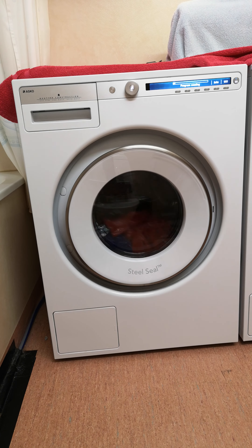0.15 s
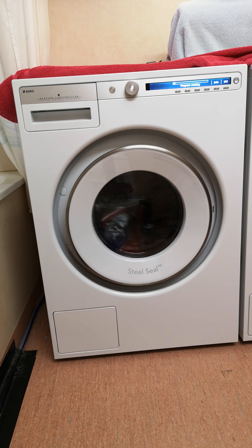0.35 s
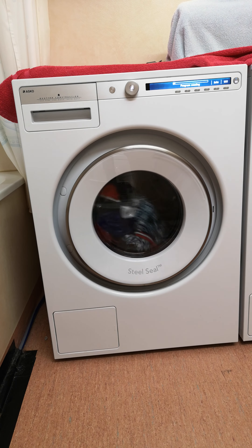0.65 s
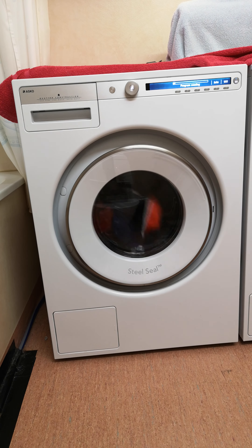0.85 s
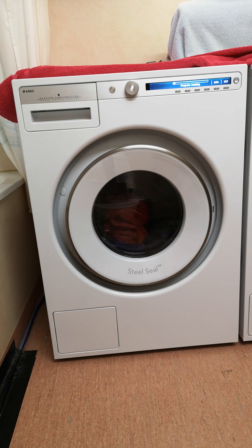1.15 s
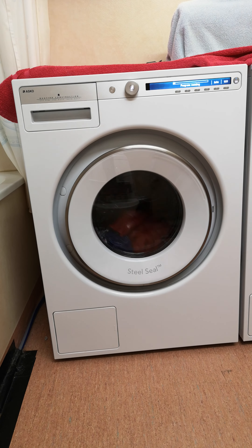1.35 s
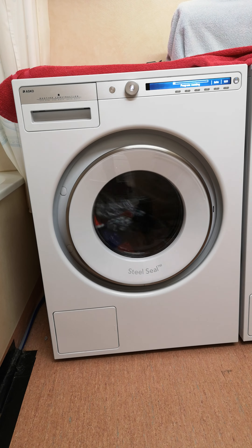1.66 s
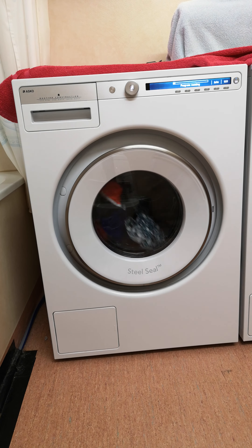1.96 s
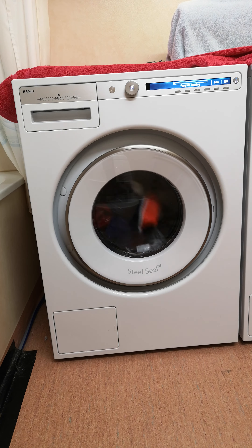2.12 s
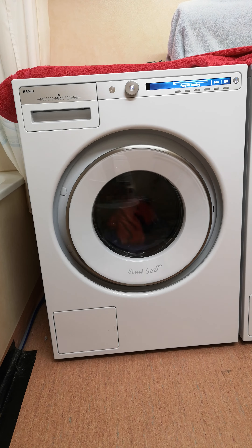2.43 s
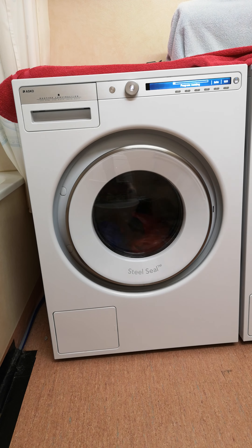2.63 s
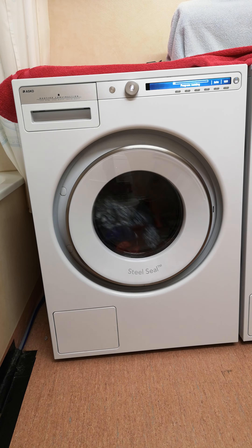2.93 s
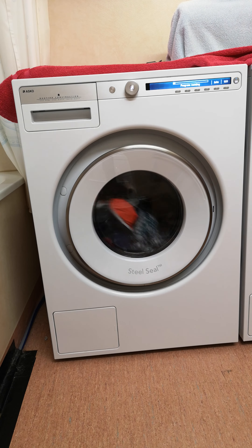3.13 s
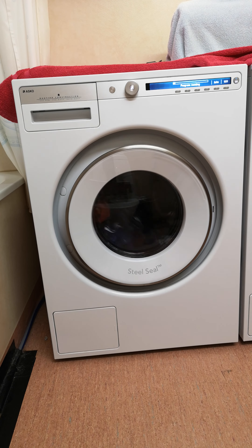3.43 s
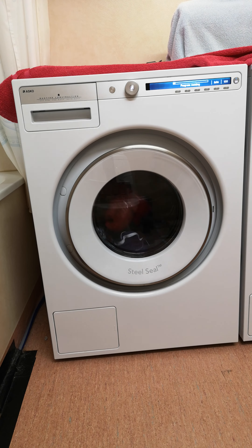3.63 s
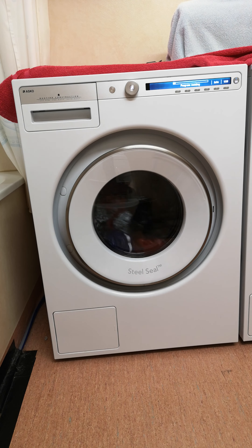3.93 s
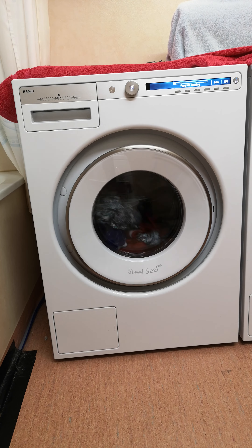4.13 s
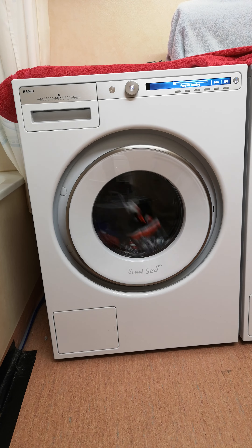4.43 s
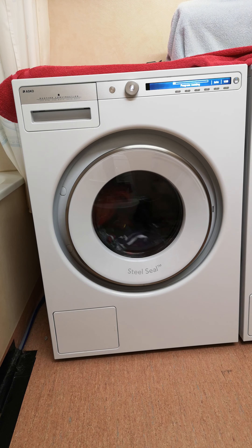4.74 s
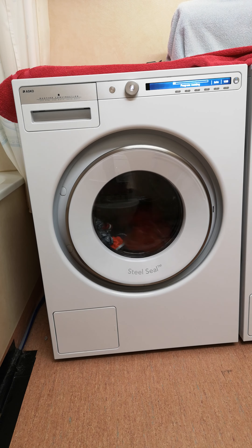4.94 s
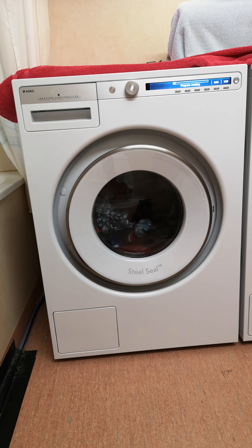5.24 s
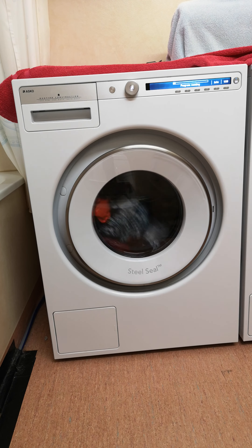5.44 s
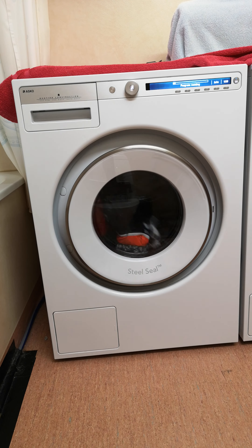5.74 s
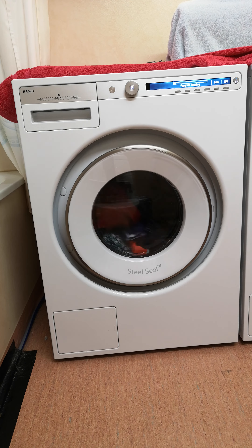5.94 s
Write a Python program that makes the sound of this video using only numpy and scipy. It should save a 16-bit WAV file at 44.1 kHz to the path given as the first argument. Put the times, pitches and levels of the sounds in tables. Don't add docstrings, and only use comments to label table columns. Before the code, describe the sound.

Wet clothes slide, flop and thud in a turning washer drum above a low throbbing electric hum, with one heavy flat thump near the end.

```python
import sys
import numpy as np
from scipy import signal
from scipy.fft import rfft, irfft
from scipy.io import wavfile
from scipy.ndimage import uniform_filter1d, map_coordinates

SR = 44100
rng = np.random.default_rng(int(sys.argv[2]) if len(sys.argv) > 2 else 0)


def file_out(sig):
    cols = np.atleast_2d(sig).T
    lim = np.clip(cols, -1, 1)
    pcm = np.round(lim * 32767).astype(np.int16)
    wavfile.write(sys.argv[1], SR, pcm)


def nominal_scale(level):
    x = np.asarray(level, float) / 20
    return 10 ** x


N = 267863

# peak_s, force_db, climb_s and fade_s (time per 10 dB)
SWISHES = [(0.001, -50.5, 0.012, 0.018), (0.183, -47.8, 0.081, 0.052), (0.463, -44.5, 0.071, 0.061),
           (0.735, -44.9, 0.025, 0.075), (0.846, -47.9, 0.024, 0.072), (0.9, -44.1, 0.059, 0.03),
           (1.088, -48.6, 0.377, 0.097), (1.371, -46.5, 0.159, 0.026), (1.491, -57.0, 0.063, 0.198),
           (1.724, -39.8, 0.022, 0.06), (1.908, -49.5, 0.031, 0.067), (2.06, -55.9, 0.02, 0.054),
           (2.271, -55.9, 0.078, 0.052), (2.361, -42.6, 0.021, 0.079), (2.587, -52.4, 0.028, 0.118),
           (2.803, -47.5, 0.078, 0.078), (2.987, -54.1, 0.043, 0.081), (3.092, -49.0, 0.02, 0.26),
           (3.4, -53.5, 0.222, 0.08), (3.532, -45.6, 0.05, 0.068), (3.977, -48.2, 0.343, 0.036),
           (4.156, -52.4, 0.048, 0.173), (4.461, -45.5, 0.014, 0.099), (4.781, -48.9, 0.258, 0.02),
           (4.989, -51.7, 0.072, 0.221), (5.257, -47.6, 0.174, 0.108), (5.496, -53.1, 0.107, 0.026),
           (5.656, -44.6, 0.05, 0.037), (5.886, -43, 0.03, 0.03), (6.028, -49.8, 0.213, 0.33)]
# peak_s, force_db, climb_s and fade_s (time per 10 dB)
DROPS = [(0.031, -60.0, 0.013, 0.137), (0.148, -40.1, 0.022, 0.05), (0.46, -45.1, 0.202, 0.054),
         (0.538, -52.0, 0.215, 0.019), (0.731, -48.9, 0.113, 0.102), (0.895, -43.7, 0.039, 0.109),
         (1.047, -40.6, 0.03, 0.106), (1.337, -42.0, 0.048, 0.04), (1.466, -47.3, 0.02, 0.068),
         (1.688, -49.3, 0.071, 0.107), (2.004, -52.7, 0.281, 0.149), (2.371, -40.4, 0.042, 0.054),
         (2.531, -44.9, 0.026, 0.028), (2.876, -52.5, 0.317, 0.03), (2.988, -54.4, 0.061, 0.198),
         (3.086, -42.2, 0.014, 0.193), (3.597, -40.0, 0.069, 0.034), (3.728, -52.6, 0.021, 0.365),
         (4.16, -43.0, 0.043, 0.04), (4.454, -57.6, 0.136, 0.073), (4.531, -43.5, 0.066, 0.051),
         (4.702, -36.7, 0.027, 0.051), (4.998, -41.5, 0.071, 0.048), (5.287, -44.3, 0.242, 0.053),
         (5.474, -45.4, 0.147, 0.039), (5.598, -43.8, 0.024, 0.115), (5.73, -48.2, 0.095, 0.055),
         (5.854, -39.2, 0.014, 0.084), (5.867, -36, 0.012, 0.012), (6.069, -45.8, 0.034, 0.047)]
# peak_s, force_db, climb_s and fade_s (time per 10 dB)
SLOSHES = [(0.0, -61.5, 0.05, 0.263), (0.148, -47.7, 0.04, 0.086), (0.465, -50.2, 0.126, 0.042),
           (0.734, -46.3, 0.081, 0.042), (0.89, -45.8, 0.055, 0.079), (1.054, -47.6, 0.071, 0.121),
           (1.338, -48.7, 0.072, 0.037), (1.519, -54.4, 0.104, 0.076), (1.703, -51.9, 0.054, 0.309),
           (2.061, -55.3, 0.021, 0.044), (2.232, -64.0, 0.045, 0.123), (2.359, -43.7, 0.044, 0.046),
           (2.586, -55.9, 0.071, 0.094), (2.799, -57.0, 0.085, 0.105), (2.994, -54.1, 0.069, 0.039),
           (3.105, -46.6, 0.117, 0.069), (3.382, -53.6, 0.153, 0.041), (3.531, -53.9, 0.051, 0.133),
           (3.737, -59.8, 0.034, 0.159), (3.852, -57.2, 0.167, 0.306), (4.14, -58.0, 0.08, 0.277),
           (4.471, -50.7, 0.06, 0.198), (4.705, -43.7, 0.032, 0.054), (4.997, -50.7, 0.103, 0.053),
           (5.305, -53.4, 0.212, 0.067), (5.477, -53.1, 0.077, 0.055), (5.595, -42, 0.02, 0.07),
           (5.867, -46.7, 0.032, 0.012), (5.924, -55.7, 0.025, 0.074), (6.07, -51.9, 0.262, 0.4)]
# peak_s, force_db, climb_s and fade_s (time per 10 dB)
BOOMS = [(0.022, -62.4, 0.4, 0.027), (0.167, -55.5, 0.022, 0.056), (0.723, -52.1, 0.287, 0.068),
         (0.872, -52.6, 0.023, 0.288), (1.09, -52.6, 0.14, 0.242), (1.481, -53.6, 0.085, 0.05),
         (1.641, -58.0, 0.019, 0.11), (1.704, -55.6, 0.038, 0.252), (1.99, -54.4, 0.04, 0.09),
         (2.357, -53.1, 0.12, 0.127), (2.597, -54.3, 0.167, 0.379), (3.152, -55.9, 0.211, 0.4),
         (3.623, -50.8, 0.117, 0.06), (3.753, -53.4, 0.049, 0.4), (4.162, -51.9, 0.057, 0.041),
         (4.47, -54.5, 0.321, 0.134), (4.678, -48.6, 0.031, 0.123), (4.992, -56.8, 0.039, 0.091),
         (5.217, -45.9, 0.04, 0.144), (5.611, -54.6, 0.053, 0.083), (5.771, -53.6, 0.139, 0.05),
         (5.891, -47.2, 0.051, 0.132)]
# peak_s, force_db, climb_s and fade_s (time per 10 dB)
JETS = [
    (1.335, -69, .08, .04),
    (2.8, -76, .05, .05),
    (3.74, -73, .04, .2),
    (4.448, -71, .02, .04),
    (4.7, -66, .03, .06),
    (5.73, -73, .05, .06),
]
SLIDE_REST_DB, SLOSH_REST_DB, WEIGHT_REST_DB, BOOM_REST_DB = -70.0, -68.0, -67.0, -72.0

# pitch_hz, level_db (per Hz)
CABINET = [(30, -38.5), (70, -8.5), (190, -2.5), (420, 2.5), (830, 0), (1080, -12), (1900, -11.5),
           (2050, -19), (2700, -19.5), (3000, -30), (4200, -38), (6500, -44.5), (10000, -52.5),
           (15000, -77)]
# pitch_hz, width_hz, lift_db
PANELS = [(111, 18, -4.5), (162.6, 9.5, -7), (216.7, 29, -13), (365, 74, 0.5), (311.3, 13, -8.5),
          (286.6, 79, 6), (631, 10, -6.5), (652, 14.4, 7.5), (728.4, 47, 6), (792.7, 44, 7), (903, 48, 3),
          (1052, 70, 3), (1151, 9.2, 8), (1234, 40, 1.5), (1350, 37, -6.5), (1420, 12, 1.5),
          (1430, 60, 2.5), (1562, 16.6, 8), (1570, 30, -2), (1732, 28, 7.5), (1825, 39, 3.5),
          (2630, 200, 2.5), (3110, 37, 8.5), (3690, 154, 9), (4380, 61, -4), (4940, 140, 4.5),
          (5370, 54, 5), (9500, 500, 4.5), (7250, 200, 3.5), (9000, 520, 9.5)]

# multiple of mains, level_db (against the main line)
HUM = [(1, -21.5), (2, -2), (3, -25), (4, -26.5), (6, -14)]
# pitch_hz, level_db (per Hz)
RUMBLE = [(3, -3), (20, -9), (38, -10), (60, -10), (85, 10.5), (95, -1), (112, -7.5), (125, -27)]
# time_s, pitch_hz, level_db
MOTOR = [
    (0.0, 54.7, -63),
    (1.0, 54.8, -67),
    (1.9, 53.6, -65),
    (2.6, 53.2, -62),
    (3.6, 53.2, -62),
    (4.4, 54.0, -67),
    (6.07, 54.4, -68),
]

# start_s, slap_db, splash_db
SLAPS = [(0.121, -41, -43.5), (0.431, -36.5, -44), (0.692, -49, -40), (0.879, -32, -45), (1.054, -35, -41),
         (1.311, -42, -43), (1.699, -41, -57), (2.341, -36, -39.5), (2.451, -44, -69), (3.099, -36, -45),
         (3.499, -44, -49), (4.143, -40, -58), (4.437, -47, -41.5), (4.669, -42, -40.5),
         (5.127, -36.5, -61), (5.35, -44, -49.5), (5.491, -41.5, -52), (5.573, -52, -42), (5.849, -35, -38)]
# start_s, level_db, pitch_hz
PATS = [(0.122, -42, 824), (0.374, -46, 794), (0.413, -39, 767), (0.431, -35, 659), (0.599, -49, 670),
        (0.692, -42, 692), (0.72, -37, 743), (0.832, -40, 805), (0.879, -34, 807), (0.992, -44, 727),
        (1.018, -41, 794), (1.055, -36, 802), (1.141, -42, 859), (1.22, -44, 622), (1.252, -44, 775),
        (1.292, -38, 740), (1.328, -36, 705), (1.703, -39, 657), (1.715, -35, 794), (1.902, -43, 689),
        (1.926, -45, 775), (2.239, -49, 735), (2.34, -38, 724), (2.451, -41, 746), (2.766, -46, 797),
        (3.076, -43, 802), (3.099, -41, 738), (3.117, -37, 735), (3.333, -44, 783), (3.491, -45, 611),
        (3.499, -41, 676), (3.52, -39, 791), (3.812, -41, 783), (3.853, -41, 837), (3.958, -41, 649),
        (4.144, -42, 643), (4.438, -42, 501), (4.451, -38, 829), (4.526, -41, 659), (4.686, -39, 716),
        (4.948, -45, 813), (5.001, -41, 794), (5.128, -42, 770), (5.159, -42, 764), (5.199, -43, 775),
        (5.23, -43, 791), (5.35, -41, 740), (5.492, -39, 789), (5.596, -42, 899), (5.851, -35, 735),
        (5.88, -33, 775), (5.934, -42, 894)]
# start_s, level_db, pitch_hz
DRIPS = [(0.1236, -54, 2650), (0.4065, -54, 2430), (0.4718, -55, 2510), (0.6923, -55, 2590),
         (0.7118, -54, 2540), (0.832, -54, 2630), (0.8505, -52, 2590), (1.0116, -56, 2460),
         (1.041, -50, 2620), (1.2615, -57, 2690), (1.3274, -51, 2500), (1.7055, -55, 2650),
         (1.737, -54, 2370), (2.3386, -52, 2600), (2.363, -50, 2500), (2.7801, -58, 2430),
         (3.0814, -53, 2620), (3.6197, -58, 2340), (3.8197, -57, 2590), (3.8362, -55, 2520),
         (4.4398, -55, 2460), (4.4657, -52, 2400), (4.4857, -51, 2640), (4.6887, -47, 2670),
         (4.9457, -58, 2600), (4.9701, -56, 2590), (5.0315, -54, 2540), (5.2639, -56, 2450),
         (5.5787, -51, 2570), (5.8566, -49, 2710)]
# start_s, level_db, pitch_hz
PLINKS = [(0.1451, -42, 1760), (0.2079, -44, 1780), (0.2244, -49, 1740), (0.2982, -50, 1740),
          (0.3661, -50, 1650), (0.6913, -39, 1730), (0.8774, -39, 1910), (1.038, -41, 1820),
          (1.1643, -48, 1820), (1.263, -45, 1550), (1.3169, -39, 1810), (1.4147, -50, 1730),
          (1.7759, -47, 1850), (1.8966, -49, 1700), (2.0443, -50, 1820), (2.3336, -42, 1530),
          (2.3436, -36, 1740), (2.3744, -39, 1560), (2.3935, -43, 1740), (2.4922, -53, 1740),
          (2.578, -49, 1710), (3.0669, -41, 1740), (3.0879, -38, 1710), (3.1193, -40, 1740),
          (3.1986, -46, 1490), (3.3623, -46, 1700), (3.5094, -47, 1950), (3.7135, -49, 1910),
          (3.8394, -48, 1750), (4.1669, -51, 1750), (4.4544, -41, 1900), (4.558, -44, 1740),
          (4.6758, -44, 1700), (4.6877, -40, 1810), (5.1781, -48, 1570), (5.2455, -48, 1590),
          (5.2874, -44, 1590), (5.4251, -46, 1740), (5.5797, -40, 1640), (5.5967, -39, 1820),
          (5.6064, -39, 1870), (5.6394, -40, 1490), (5.8471, -40, 1410), (5.8631, -38, 1500)]
# start_s, level_db, pitch_hz
KNOCKS = [(0.15, -32.5, 380), (0.433, -41, 303), (1.051, -33.5, 346), (1.455, -33.5, 340.5),
          (2.326, -41, 290), (2.824, -36, 284), (3.086, -36, 267), (3.124, -33, 280), (3.591, -34, 260),
          (3.655, -34, 292), (3.876, -38.5, 270), (4.123, -32, 290), (4.444, -29, 282), (4.57, -39, 313),
          (4.659, -28, 299.5), (4.702, -35, 274), (4.763, -39, 313), (4.934, -39, 283),
          (4.981, -31.5, 266.6), (5.196, -31, 339), (5.732, -37.5, 257)]
# start_s, level_db, pitch_hz
THUDS = [(0.154, -43, 382), (0.192, -46, 382), (0.428, -43, 474), (0.614, -54, 425), (0.721, -44, 436),
         (0.829, -48, 433), (0.878, -45, 554), (1.146, -51, 423), (1.282, -48, 420), (1.32, -41, 493),
         (1.727, -43, 490), (2.345, -43, 388), (2.531, -53, 390), (3.087, -43, 401), (3.497, -46, 452),
         (3.734, -48, 409), (4.439, -49, 441), (4.646, -50, 560), (4.68, -43, 415), (4.965, -48, 382),
         (5.004, -44, 390), (5.413, -46, 388), (5.477, -46, 428), (5.525, -49, 388), (5.602, -43, 444),
         (5.738, -52, 382)]
# start_s, level_db
JOLTS = [(0.695, -37), (1.275, -44), (2.341, -44), (2.537, -45), (2.775, -56), (3.109, -55), (3.377, -43),
         (3.779, -66), (5.184, -51), (5.673, -58), (5.848, -41), (5.946, -42)]
# start_s, level_db, pitch_hz
TICKS = [
    (2.355, -35, 1717),
    (3.732, -59, 3660),
    (3.768, -62, 3690),
    (4.292, -46.5, 1910),
    (4.302, -52, 2130),
    (4.432, -43, 1780),
    (4.485, -47, 2630),
]
# start_s, level_db, pitch_hz
THUMP = [
    (5.861, -15.5, 350),
]

# time_s, level_db
STEADY = [(0.0, -45), (0.15, -42), (0.59, -44), (0.78, -41.5), (0.96, -43.5), (1.39, -42), (1.72, -45.5),
          (2.25, -46.5), (2.43, -43.5), (2.65, -46), (3.35, -41.5), (3.62, -45), (3.9, -41), (4.25, -43),
          (5.25, -41.5), (5.88, -44.5), (5.99, -40), (6.07, -45)]
# middle_s, depth_db
CLAMPS = [
    (0.07, -2),
    (0.6, -2),
    (3.475, -4),
    (4.075, -4.5),
    (4.33, -7),
    (4.63, -1.5),
    (4.87, -4.5),
]
# pitch_hz, level_db (per Hz)
HISS = [(30, 19), (300, 24), (1500, 13.5), (2600, 13), (3100, 6.5), (5500, 4), (6200, 1.5), (9000, -2.5),
        (14500, -3), (16000, -1)]


def evened(x):
    return x / np.sqrt(np.mean(x ** 2) + 1e-20)


def read(points, hz):
    f, value = np.transpose(points)
    return np.interp(np.log(hz + 1), np.log(f + 1), value)


def lumps(shape, across, along):
    z = rng.standard_normal(shape[::-1]).T
    blurred = uniform_filter1d(z, across, 0)
    return evened(uniform_filter1d(blurred, along, 1))


def surges(t, rows, rest_db):
    s, db, climb, fade = np.transpose(rows)[:, :, None]
    away = np.where(t < s, (s - t) / climb, (t - s) / fade)
    power = (nominal_scale(db - 10 * away) ** 2).sum(0)
    return 10 * np.log10(power + nominal_scale(rest_db) ** 2)


def blows(rows, t60, rise, trim_db):
    out, t = np.zeros(N + SR), np.arange(SR // 4) / SR
    for s, db, hz in rows:
        shape = (1 - np.exp(-t / rise)) * nominal_scale(db + trim_db - 60 * t / t60)
        start = round(s * SR)
        out[start:start + len(t)] += shape * np.sin(2 * np.pi * hz * t)
    return out[:N]


def suppressor_db():
    lag_s, clamp_s = 0.045, 0.09
    t = np.arange(0, N / SR + 0.1, 0.005)
    busy_db = surges(t - lag_s, DROPS, WEIGHT_REST_DB)
    opening_db = 0.1 * uniform_filter1d(busy_db - busy_db.mean(), size=20)
    db = np.interp(t, *np.transpose(STEADY)) + opening_db
    for s, depth_db in CLAMPS:
        db = db + depth_db * np.maximum(1 - abs(t - s) / clamp_s, 0)
    return np.interp(np.arange(N) / SR, t, db)


def tumble():
    frames, hz = N // 128 + 5, np.fft.rfftfreq(512, 1 / SR)
    t = np.arange(frames) * 128 / SR
    slide = surges(t, SWISHES, SLIDE_REST_DB)
    slosh = surges(t, SLOSHES, SLOSH_REST_DB)
    weight = surges(t, DROPS, WEIGHT_REST_DB)
    boom = surges(t, BOOMS, BOOM_REST_DB)
    spray = 0.36 * (slide + 55) + 0.3 * (slosh + 55) - 76.0
    spray = 10 * np.log10(nominal_scale(spray) ** 2 + nominal_scale(surges(t, JETS, -95.0)) ** 2)
    mist = 0.7 * (spray + 75) - 29.8
    levels = np.array([boom + 26.6, weight + 17.2, slide + 18.5, slosh + 25.2, spray + 44.3, mist])
    place = read([(170, 0), (300, 1), (780, 2), (1900, 3), (3700, 4), (9000, 5)], hz)
    field_db = map_coordinates(levels, np.meshgrid(place, np.arange(frames), indexing="ij"), order=1)
    field_db = field_db + 1.7 * lumps(field_db.shape, across=4, along=6)
    field_db = field_db + 0.54 * lumps((1, frames), across=1, along=3)
    a, b = rng.standard_normal((frames, len(hz), 2)).T
    return signal.istft((a + 1j * b) * nominal_scale(field_db), nperseg=512, noverlap=384)[1][:N]


def causal(db):
    log_gain = np.log(nominal_scale(np.r_[db, db[-2:0:-1]]))
    return np.fft.ifft(np.exp(np.conj(signal.hilbert(log_gain)))).real[:len(db)]


def through_cabinet(drum_sound):
    hz = np.fft.rfftfreq(8192, 1 / SR)
    body_db = read(CABINET, hz)
    for f, width, lift_db in PANELS:
        body_db = body_db + lift_db / (1 + (2 * (hz - f) / width) ** 2)
    return nominal_scale(-19.0) * signal.oaconvolve(drum_sound, causal(body_db))[:N]


def hum():
    mains_hz = 50.008
    turn = 2 * np.pi * mains_hz * np.arange(N) / SR
    lines = sum(nominal_scale(db) * np.cos(k * turn) for k, db in HUM)
    return -nominal_scale(suppressor_db() + 5.5) * lines


def rumble():
    shape_db = np.interp(np.fft.rfftfreq(N, 1 / SR), *np.transpose(RUMBLE), right=-200)
    shaking = irfft(rfft(rng.standard_normal(N)) * nominal_scale(shape_db), N)
    wander_db = 2.9 * lumps((1, N), across=1, along=5000)[0]
    return nominal_scale(suppressor_db() - 13.0 + wander_db) * evened(shaking)


def motor():
    s, hz, db = np.transpose(MOTOR)
    t = np.arange(N) / SR
    phase = 2 * np.pi * np.cumsum(np.interp(t, s, hz)) / SR + 3.4
    return nominal_scale(np.interp(t, s, db)) * np.cos(phase)


def hiss():
    z = rfft(rng.standard_normal((N, 2)).T) * nominal_scale(read(HISS, np.fft.rfftfreq(N, 1 / SR)))
    steady_db = suppressor_db()
    breathing_db = steady_db - steady_db.mean()
    t = np.arange(0, N / SR + 0.1, 0.005)
    slosh_db = uniform_filter1d(surges(t, SLOSHES, SLOSH_REST_DB), size=12)
    busy_db = np.interp(np.arange(N) / SR, t, slosh_db)
    return nominal_scale(-65 + 0.5 * breathing_db + 0.12 * (busy_db + 56)) * evened(irfft(z, N))


def noise_band(low_hz, high_hz):
    band = signal.butter(2, [low_hz, high_hz], "band", fs=SR, output="sos")
    return evened(signal.sosfilt(band, rng.standard_normal(N)))


def slaps():
    t, force = np.arange(SR // 4) / SR, np.zeros((2, N + SR))
    for s, slap_db, splash_db in SLAPS:
        parts_db = np.array([[slap_db + 4.5], [splash_db + 17.0]])
        drain = (1 - np.exp(-t / 0.0013)) * nominal_scale(parts_db - 60 * t / 0.34)
        start = round(s * SR)
        force[:, start:start + len(t)] += drain
    dull = nominal_scale(8.0) * noise_band(550, 1100) * force[0, :N]
    bright = nominal_scale(14.5) * noise_band(1100, 5000) * force[1, :N]
    return dull + bright


def pats():
    return blows(PATS, t60=0.07, rise=0.005, trim_db=6.5)


def drips():
    return blows(DRIPS, t60=0.06, rise=0.004, trim_db=7.5)


def plinks():
    return blows(PLINKS, t60=0.06, rise=0.005, trim_db=6.0)


def knocks():
    return blows(KNOCKS, t60=0.15, rise=0.0072, trim_db=1.5)


def thuds():
    return blows(THUDS, t60=0.1, rise=0.005, trim_db=4.5)


def jolts():
    rows = [(s, db, 72.0) for s, db in JOLTS]
    return blows(rows, t60=0.12, rise=0.015, trim_db=8.0)


def ticks():
    return blows(TICKS, t60=0.08, rise=0.0023, trim_db=2.0)


def thump():
    return blows(THUMP, t60=0.1, rise=0.012, trim_db=0.0)


def scene():
    cloth = through_cabinet(tumble() + slaps())
    drone = hum() + rumble() + motor()
    water = drips() + plinks()
    landings = pats() + knocks() + thuds() + jolts() + ticks() + thump()
    return np.tile(cloth + drone + water + landings, (2, 1))


def low_pass(x):
    return signal.sosfilt(signal.butter(12, 15720, fs=SR, output="sos"), x)


def record(dry):
    cover_hz, lag_samples = 300, 23
    keep = np.exp(-2 * np.pi * cover_hz / SR)
    left = signal.lfilter(np.r_[np.zeros(lag_samples), 1 - keep], [1, -keep], dry[0])
    mix = np.array([left, dry[1]]) + hiss() - 0.0005
    return low_pass(mix)


dry = scene()
out = record(dry)
file_out(out)
```